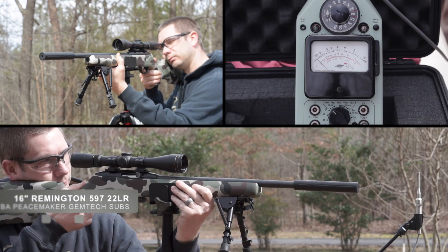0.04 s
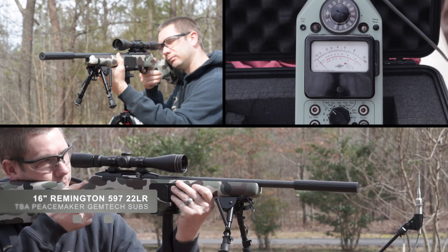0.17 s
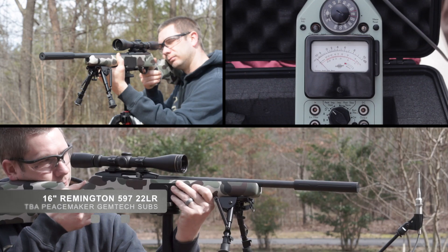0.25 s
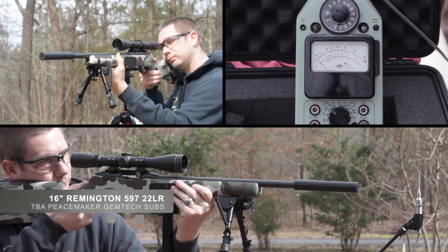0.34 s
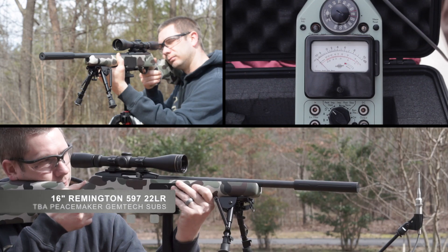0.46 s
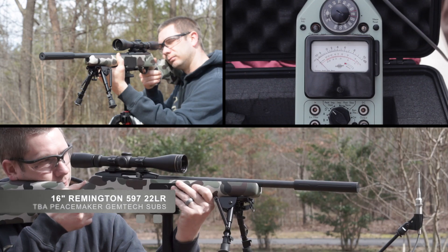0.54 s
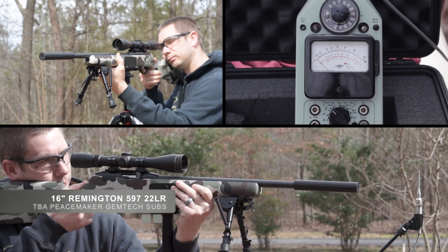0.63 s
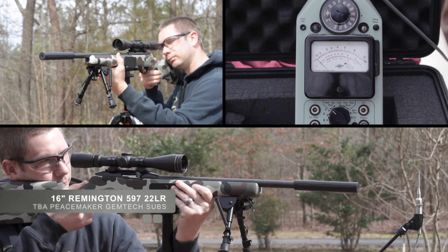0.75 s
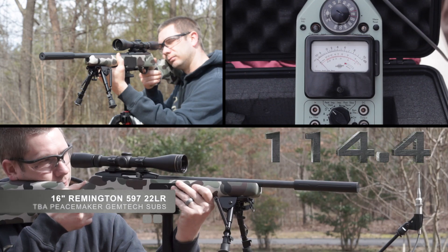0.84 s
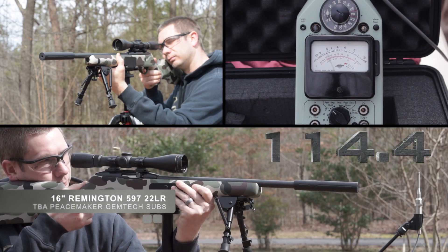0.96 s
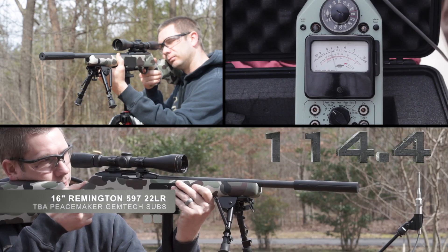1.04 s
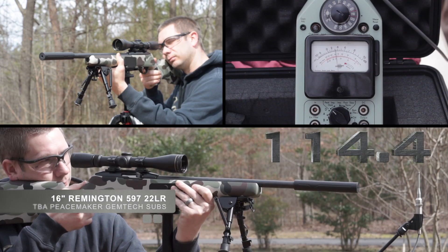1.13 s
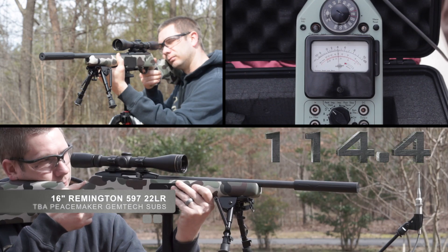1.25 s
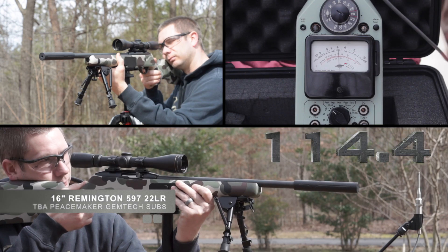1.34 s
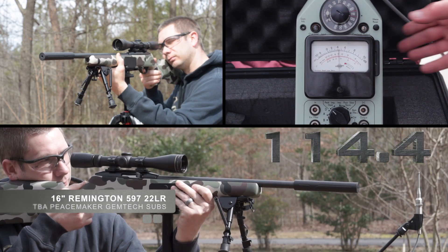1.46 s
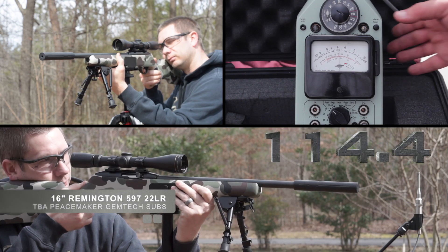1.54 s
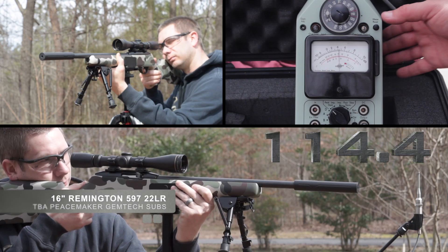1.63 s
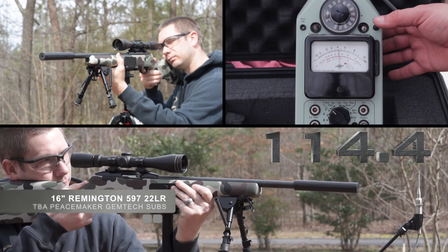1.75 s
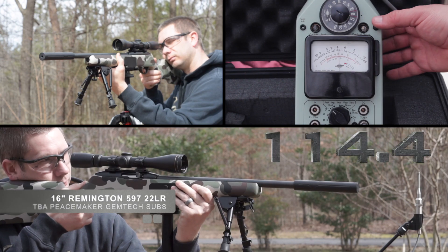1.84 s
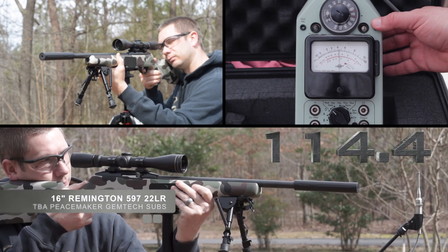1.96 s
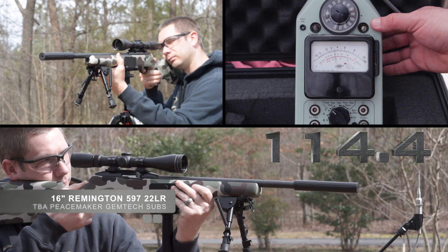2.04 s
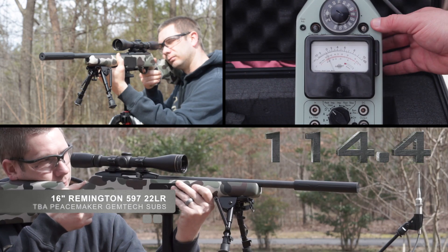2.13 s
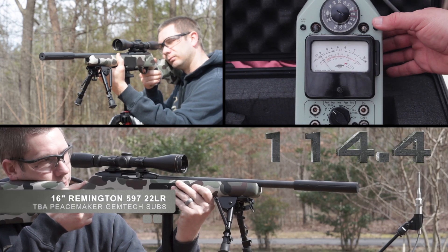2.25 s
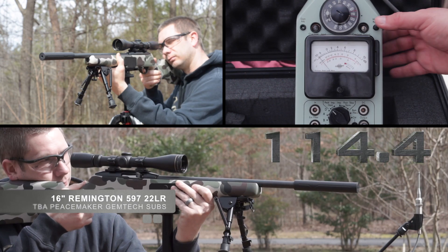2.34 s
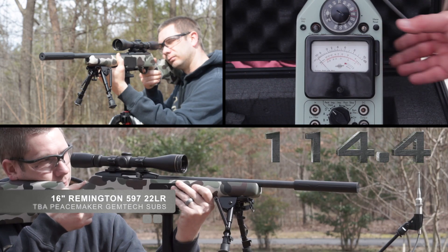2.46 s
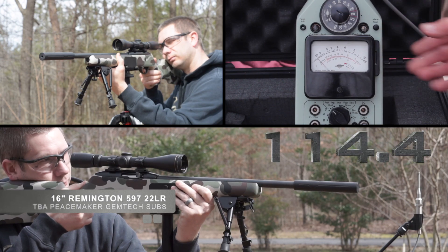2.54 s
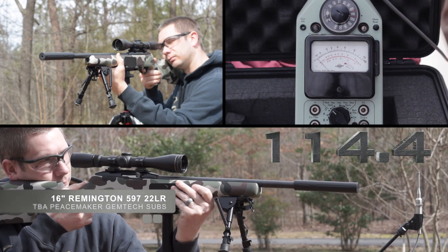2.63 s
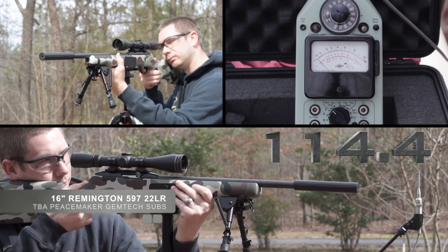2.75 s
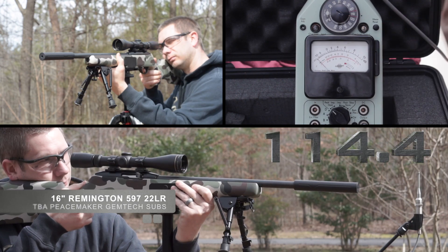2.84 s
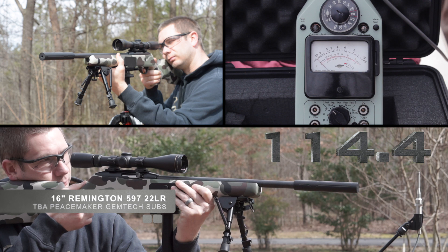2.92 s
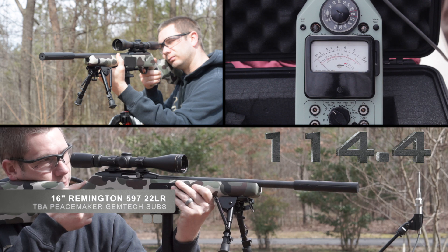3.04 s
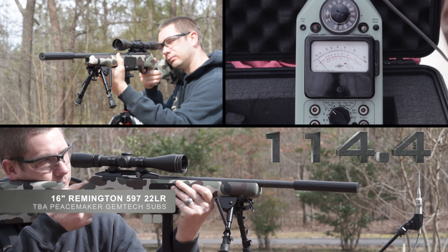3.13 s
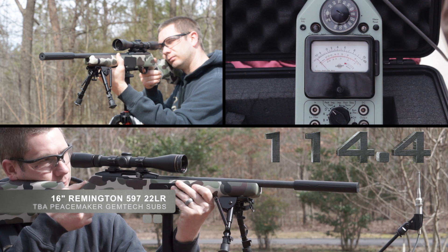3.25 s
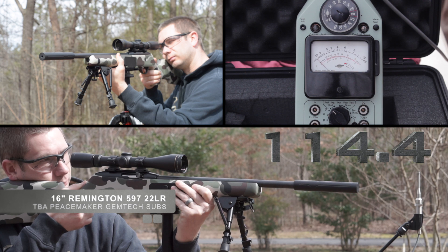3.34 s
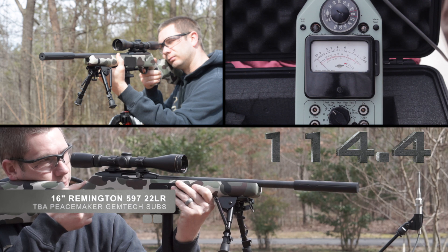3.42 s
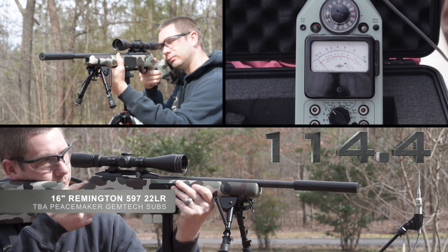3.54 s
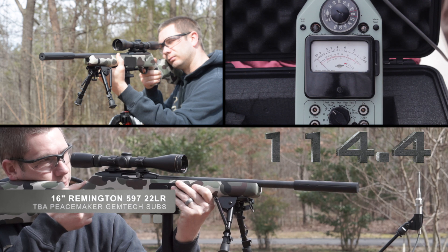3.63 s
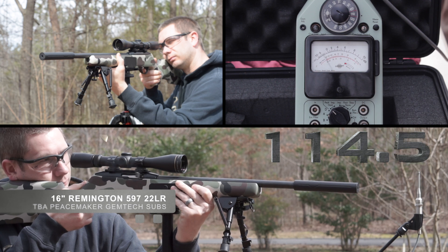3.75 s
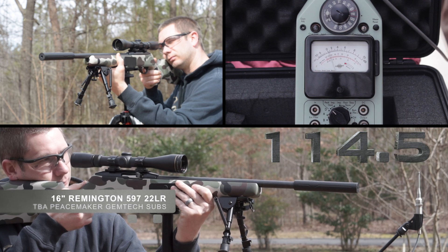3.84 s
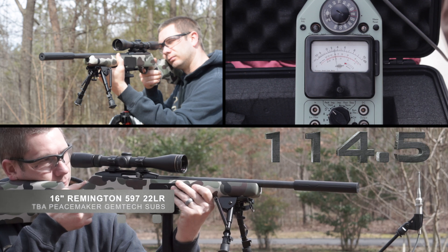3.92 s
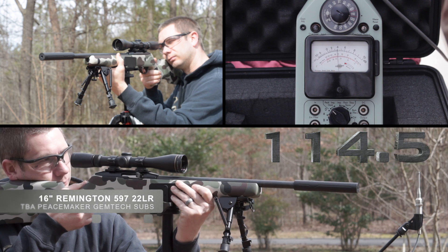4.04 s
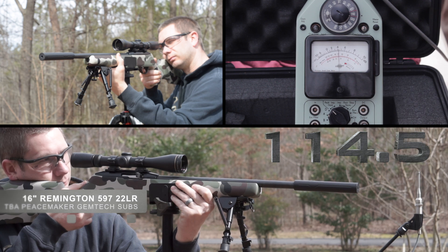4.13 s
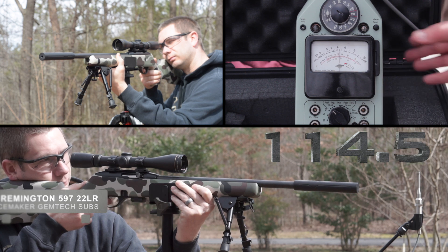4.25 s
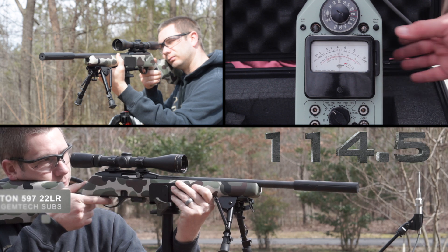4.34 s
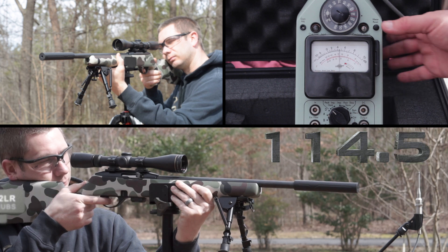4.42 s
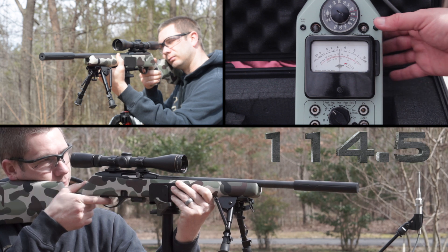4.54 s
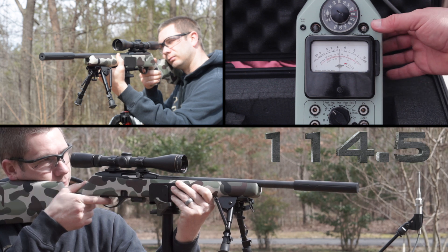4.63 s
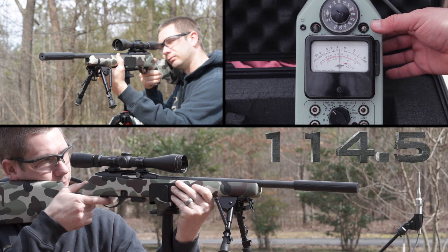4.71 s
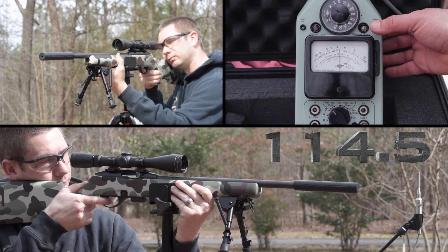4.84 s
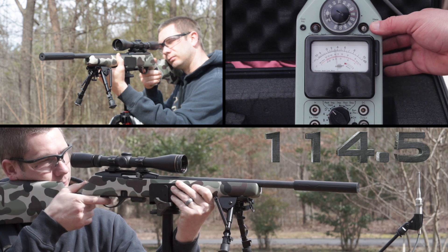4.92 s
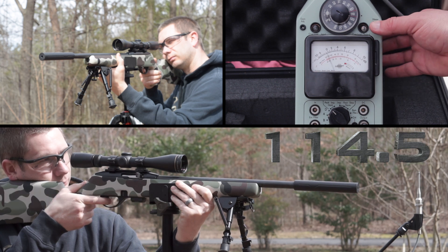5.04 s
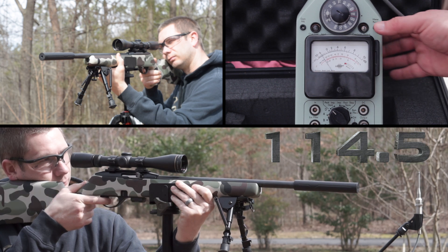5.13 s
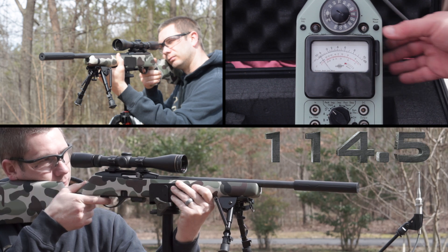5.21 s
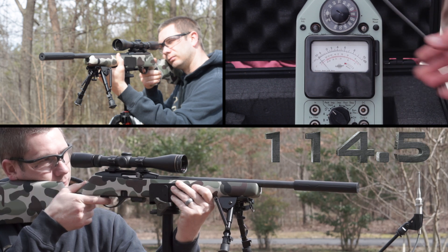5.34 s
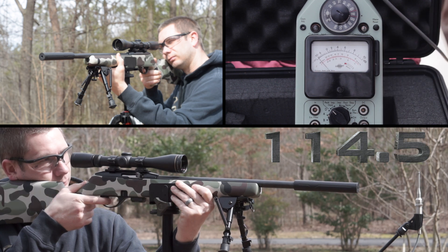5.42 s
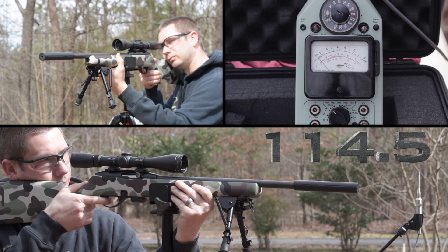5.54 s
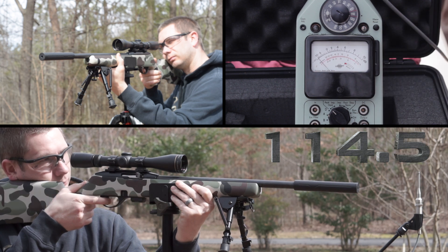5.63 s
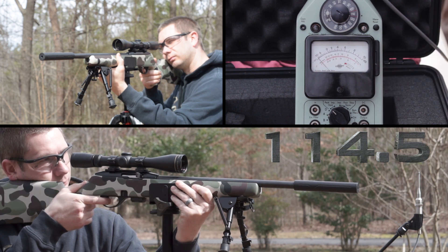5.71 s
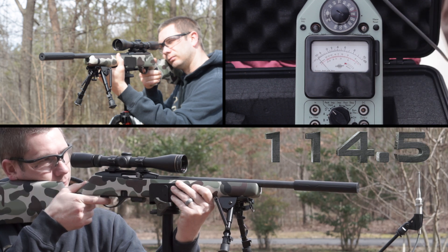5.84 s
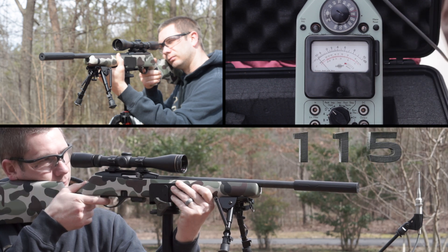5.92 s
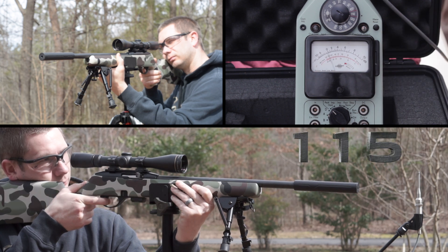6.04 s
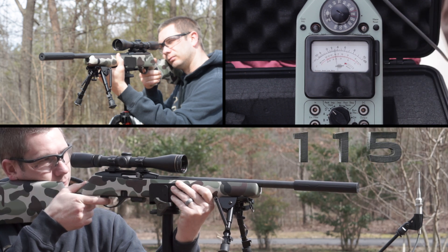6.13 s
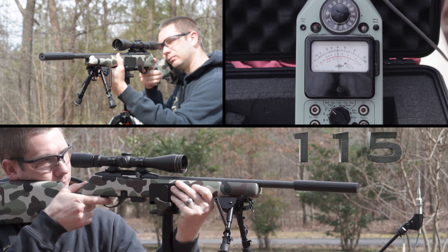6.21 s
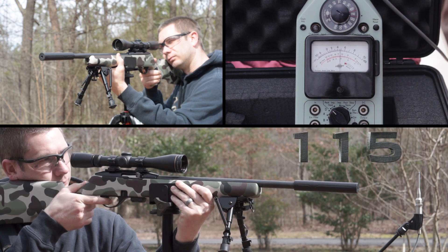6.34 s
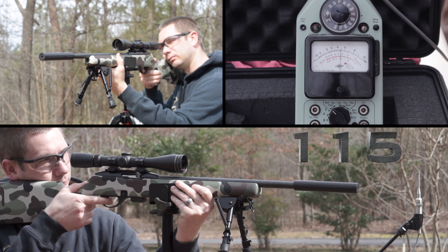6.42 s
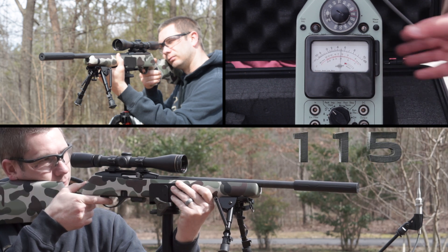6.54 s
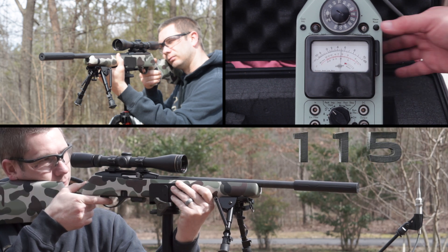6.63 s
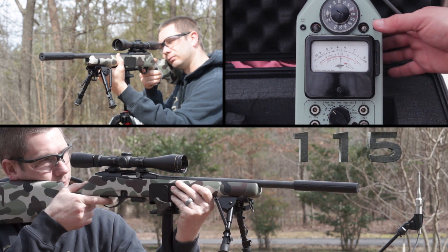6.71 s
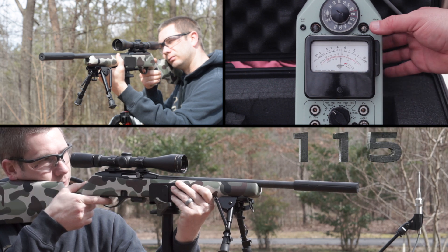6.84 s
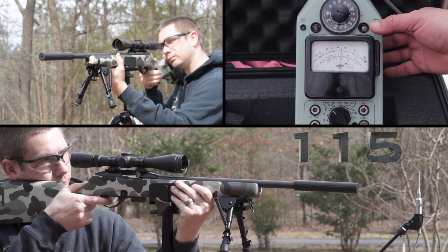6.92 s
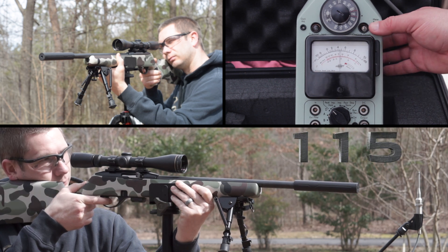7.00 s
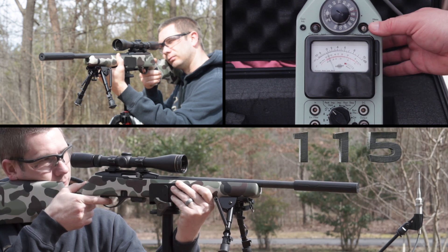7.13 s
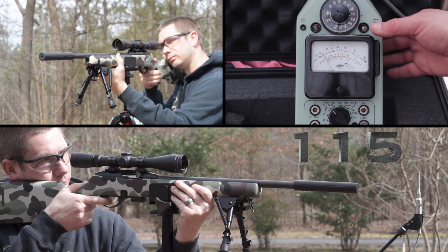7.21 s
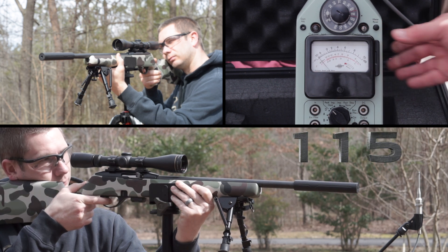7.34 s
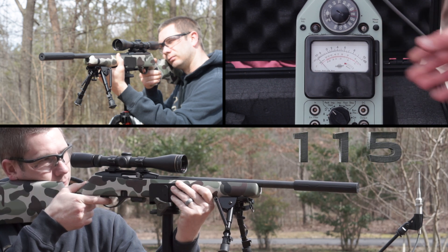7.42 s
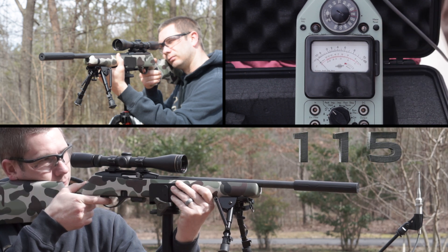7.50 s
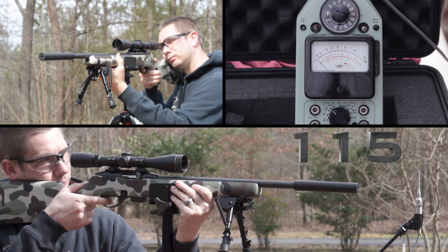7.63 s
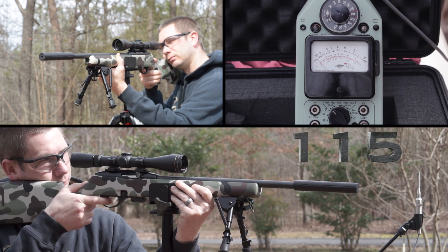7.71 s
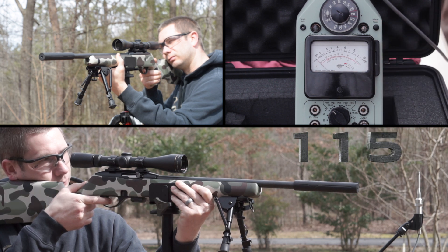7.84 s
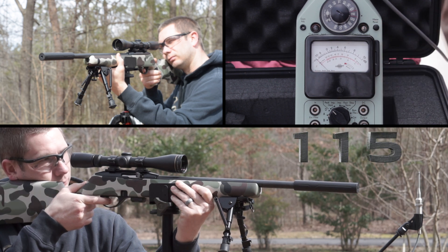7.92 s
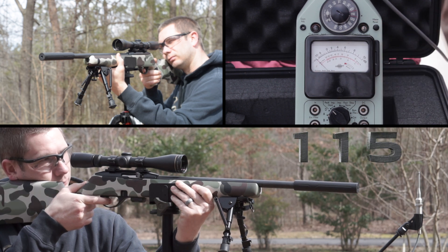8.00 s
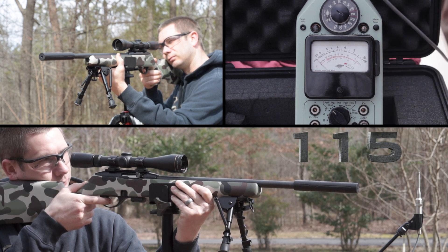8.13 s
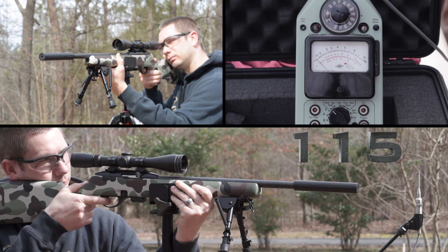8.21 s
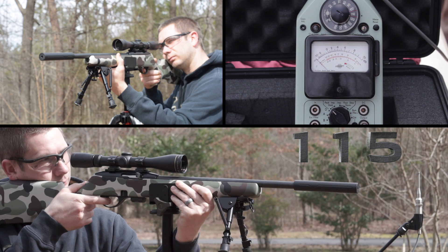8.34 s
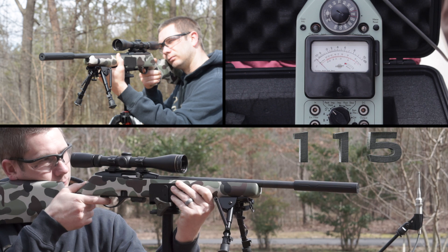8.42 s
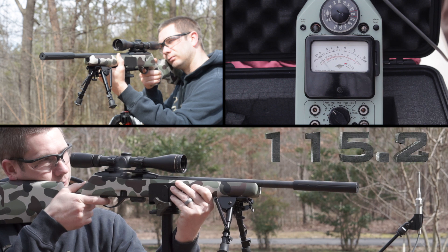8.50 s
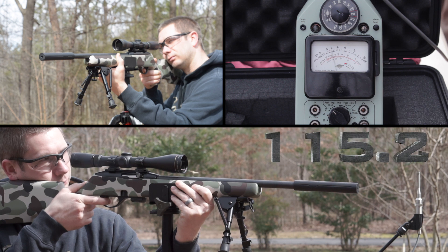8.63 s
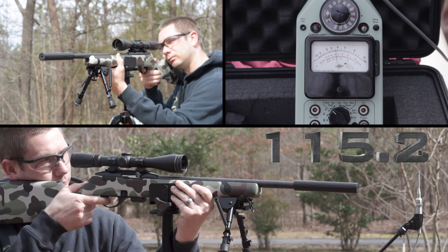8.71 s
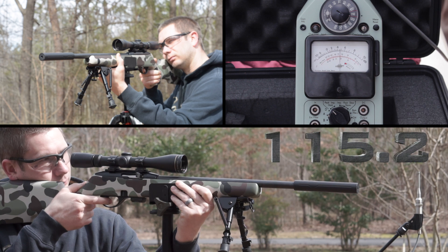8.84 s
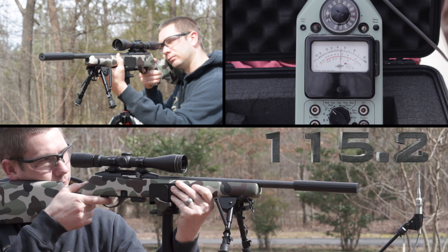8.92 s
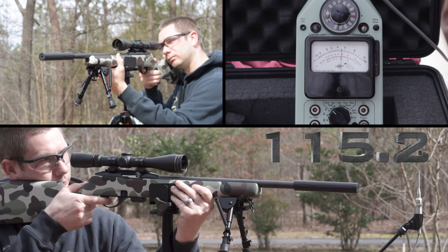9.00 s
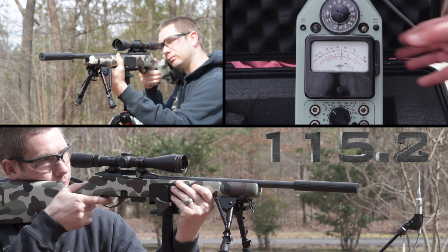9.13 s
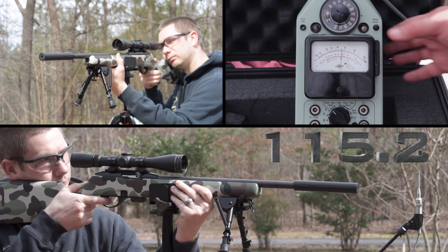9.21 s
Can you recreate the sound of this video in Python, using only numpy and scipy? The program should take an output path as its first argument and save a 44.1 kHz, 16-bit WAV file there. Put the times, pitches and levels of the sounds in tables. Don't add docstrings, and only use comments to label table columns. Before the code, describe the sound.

In a quiet wood, a silenced self-loading rifle snaps four times, its steel action clattering, with small case ticks and dull bumps between later shots.

```python
import sys
import numpy as np
from scipy import signal
from scipy.fft import rfft, irfft
from scipy.io import wavfile
from scipy.ndimage import uniform_filter1d

SR = 44100
rng = np.random.default_rng(int(sys.argv[2]) if len(sys.argv) > 2 else 0)


def unload_audio(sound):
    columns = np.transpose(np.atleast_2d(sound))
    steps = np.round(np.clip(columns, -1, 1) * 32767)
    wavfile.write(sys.argv[1], SR, steps.astype(np.int16))


def linear_from_db(decibels):
    return 10 ** (np.asarray(decibels, float) / 20)


N = 408581

# pitch_hz, level_db (per Hz)
HUM_AND_HISS = [(90, -30.5), (150, -3.5), (250, -7), (450, -10), (650, -10), (980, -8.5), (1540, -12.5),
                (2100, -19.5), (2800, -24.5), (6100, -28), (15100, -29.5), (16700, -33.5)]
# start_s, level_db
WIND_LEVEL = [(0.0, -73.5), (1.08, -66), (2.01, -69.5), (2.27, -66), (2.71, -68.5), (3.61, -69.5),
              (3.82, -66.5), (5.44, -68), (6.06, -66.5), (6.27, -70), (6.44, -66), (7.32, -67.5),
              (7.48, -64), (8.2, -58), (9.05, -69.5), (9.26, -68.5)]
# pitch_hz, level_db (per Hz)
WIND_COLOUR = [(20, -10.5), (40, -5.5), (80, 4), (120, -6), (200, -22.5), (400, -34)]
# muzzle_s, report_db, bolt_round_trip_s, echo_db
SHOTS = [
    (0.9211, -7.5, .0424, -5.5),
    (3.7645, -7, .0423, -4.5),
    (5.998, -7, .0414, -4),
    (8.5467, -6.5, .0441, -3.4),
]
# pitch_hz, level_db, t60_s (time to fade by 60 dB)
TRIGGER_RINGS = [(704, -8.5, 0.012), (1500, -8.5, 0.011), (2200, -9.5, 0.0055), (2816, 0, 0.01),
                 (3800, -2.5, 0.0091), (5200, -3, 0.0048), (6760, -5, 0.0028), (9000, -8.5, 0.0024)]
# pitch_hz, level_db, t60_s
SUPPRESSOR_RINGS = [(604.8, -7, 0.048), (985, -12.5, 0.028), (1510, -10, 0.053), (1910, -8.5, 0.035),
                    (2463, 8, 0.028), (2664, 0, 0.039), (3050, -7, 0.018), (3536, -2, .01),
                    (4570, 2, 0.0036), (5800, -9, 0.0066), (6660, -7.5, 0.0031), (9260, -10, 0.0027),
                    (13500, -15, .005)]
# share_of_round_trip, level_db (against the report)
BOLT_KNOCKS = [
    (.42, -24),
    (.59, -25.5),
    (.75, -26.5),
]
# pitch_hz, level_db, t60_s
BOLT_RINGS = [(663.7, -11.5, 0.046), (1329.5, -6, .04), (1558, -4, 0.061), (2150, -8, 0.015),
              (3800, -8.5, 0.015), (4570, 1.5, 0.01), (5530, 1, 0.0076), (7170, -9, 0.014),
              (8680, -4.5, .006), (10500, -8, 0.0054), (13240, -2.5, 0.011)]
# pitch_hz, level_db, t60_s
REBOUND_RINGS = [(840, -11.5, .02), (1530, 3.5, 0.04), (2500, -8.5, 0.025), (3700, -6.5, 0.06),
                 (4530, -2.5, 0.0077), (4970, -1.5, 0.0088), (7060, -12.5, 0.032), (8860, -11, 0.0041)]
# start_s, level_db
RESETS = [
    (1.2121, -45),
    (4.03, -45),
    (6.2775, -44),
    (8.834, -48),
]
# pitch_hz, near_trees_db, near_t60_s, far_trees_db, far_t60_s
TRUNK_ECHOES = [(250, -65, .2, -74.5, 1.1), (702.6, -62.5, 0.54, -75, 0.44), (1500, -58, 0.7, -66.5, 1.8),
                (2500, -49, 0.32, -59.5, 1.3), (4100, -51.5, 0.39, -65, 2.3), (5500, -54, 0.75, -66, 1.6),
                (7500, -53.5, .25, -66, .75), (10000, -52.5, 0.56, -66.5, 0.44),
                (15000, -54.5, .2, -69.5, .5)]
# delay_s, lift_db, spread_s
TREE_ROWS = [
    (.105, -4, 0.014),
    (.132, 3, 0.0022),
    (0.149, 7, 0.0011),
    (0.191, 5, 0.0032),
    (.21, -1.5, .012),
    (0.329, -0.5, 0.005),
]
# pitch_hz, level_db, t60_s
ECHO_RING = (2480, -34.5, 0.015)
# start_s, level_db, pitch_hz
CASE_TICKS = [
    (4.207, -73.5, 8500),
    (4.218, -64, 1185),
    (6.382, -70, 2500),
    (6.394, -53, 5340),
    (6.434, -70, 9000),
    (6.638, -63.5, 3560),
    (8.983, -67.5, 9000),
    (8.995, -58.5, 2500),
    (9.237, -61, 1190),
]
# start_s, level_db, pitch_hz, t60_s
STAND_KNOCKS = [
    (4.216, -55, 325, 0.025),
    (4.239, -52, 112, 0.056),
    (6.329, -57, 70, .06),
    (6.436, -56, 297, 0.04),
    (6.447, -45, 85.8, 0.36),
    (8.99, -61, 298, .05),
    (9.223, -50, 80, 0.073),
]


def rms_one(x):
    return x / np.sqrt(np.mean(x ** 2) + 1e-20)


def passed(x, order, hz, kind="low"):
    return signal.sosfilt(signal.butter(order, hz, kind, fs=SR, output="sos"), x)


def at_hz(points, hz, column=1):
    table = np.array(points)
    return np.interp(np.log(hz), np.log(table[:, 0]), table[:, column])


def add(track, start_s, sound):
    i = round(start_s * SR)
    track[i:i + len(sound)] += sound[:N - i]


def drift(rate_hz):
    r = np.exp(-80 * np.pi * rate_hz / SR)
    slow = signal.lfilter([1], [1, -2 * r, r * r], rng.standard_normal(N // 40 + 2002))[2000:]
    return np.interp(np.arange(N) / 40, np.arange(len(slow)), rms_one(slow))


def noise_bands(size, low_hz, high_hz):
    edges = low_hz * 2 ** np.arange(0, np.log2(high_hz / low_hz), 0.5)
    white = rng.standard_normal((2, size))
    for k, low in enumerate(edges):
        high = min(low * np.sqrt(2), 0.45 * SR)
        yield np.sqrt(low * high), passed(white[k % 2], 2, [low, high], "band")


def ring(push, hz, t60_s):
    r = linear_from_db(-60 / (t60_s * SR))
    w = 2 * np.pi * hz / SR
    return signal.lfilter([0, np.sin(w)], [1, -2 * r * np.cos(w), r * r], push)


def strike(rings, level_db, burst_s, rise_s, crack_db, crack_hz):
    t = np.arange(3500) / SR
    push = rng.laplace(size=len(t)) * (1 - np.exp(-t / rise_s)) * np.exp(-t / burst_s)
    body = 0
    for hz, db, t60_s in rings:
        body = body + rms_one(ring(push, hz, t60_s)) * linear_from_db(db + rng.normal(0, 1.2))
    crack = passed(push, 1, crack_hz)
    sound = rms_one(body) + linear_from_db(crack_db) * rms_one(crack)
    return linear_from_db(level_db) * 0.083 * rms_one(passed(sound, 4, 430, "high"))


def ambience():
    hz = np.maximum(np.fft.rfftfreq(N, 1 / SR), 1)
    noise = irfft(rfft(rng.standard_normal(N)) * linear_from_db(at_hz(HUM_AND_HISS, hz)), N)
    return linear_from_db(-73.5 + 0.5 * drift(0.94)) * rms_one(noise)


def wind():
    gust = drift(1.3)
    rumble = 0
    for hz, noise in noise_bands(size=N, low_hz=20, high_hz=400):
        flutter = drift(7.1)
        rumble = rumble + noise * linear_from_db(at_hz(WIND_COLOUR, hz) + 1.1 * gust + 0.38 * flutter)
    level_db = np.interp(np.arange(N) / SR, *np.transpose(WIND_LEVEL))
    return linear_from_db(level_db) * rms_one(rumble)


def hammer_fall(out, muzzle_s, db):
    add(out, muzzle_s - 0.0046, strike(TRIGGER_RINGS, db - 21.5, burst_s=0.004, rise_s=0.00035,
                                       crack_db=-0.5, crack_hz=9000))


def gas_burst(out, muzzle_s, db):
    add(out, muzzle_s - 0.0005, strike(SUPPRESSOR_RINGS, db, burst_s=0.0046, rise_s=0.0002,
                                       crack_db=-1.5, crack_hz=6940))
    shove = passed(np.pad(np.hanning(60), (0, 3000)), 2, 60, "high")
    add(out, muzzle_s + 0.0027, -linear_from_db(-21) / 30 * ring(shove, hz=155, t60_s=0.02))


def gas_dip_and_case_pop(out, muzzle_s, db):
    pulse = signal.lfilter([1, -1], [1, -0.97], np.pad(np.hanning(24), (0, 600)))
    add(out, muzzle_s + 0.0042 - 0.0003, -linear_from_db(-11) * pulse)
    add(out, muzzle_s + 0.0073, strike(TRIGGER_RINGS[2:], db - 10.5, burst_s=0.00034, rise_s=0.0001,
                                       crack_db=-2, crack_hz=9000))


def bolt_travel(out, muzzle_s, db, trip_s):
    for share, knock_db in BOLT_KNOCKS:
        add(out, muzzle_s + share * trip_s, strike(REBOUND_RINGS, db + knock_db, burst_s=0.0013,
                                                   rise_s=0.00026, crack_db=-2, crack_hz=8000))


def bolt_slam(out, slam_s, db):
    add(out, slam_s - 0.0002, strike(BOLT_RINGS, db - 5.5, burst_s=0.0006, rise_s=0.0001,
                                     crack_db=-4, crack_hz=12000))
    add(out, slam_s + 0.0206, strike(REBOUND_RINGS, db - 18.5, burst_s=0.00035, rise_s=0.00019,
                                     crack_db=-6, crack_hz=8010))


def trigger_reset(out, reset_s, db):
    add(out, reset_s, strike(TRIGGER_RINGS, db, burst_s=0.002, rise_s=0.00067, crack_db=-7.5, crack_hz=8105))
    add(out, reset_s + 0.0058, strike(TRIGGER_RINGS[:6], db - 7, burst_s=0.0011, rise_s=0.00026,
                                      crack_db=-23, crack_hz=4300))


def rifle():
    out = np.zeros(N)
    for (muzzle_s, db, trip_s, _), (reset_s, reset_db) in zip(SHOTS, RESETS):
        hammer_fall(out, muzzle_s, db)
        gas_burst(out, muzzle_s, db)
        gas_dip_and_case_pop(out, muzzle_s, db)
        bolt_travel(out, muzzle_s, db, trip_s)
        bolt_slam(out, muzzle_s + trip_s, db)
        trigger_reset(out, reset_s, reset_db)
    return out


def ground(x):
    delay_s, level_db = 0.0055, -5
    dull = passed(x, 1, 7000)
    middle = passed(dull, 1, [300, 1500], "band")
    reflection = dull - (1 - linear_from_db(-6)) * middle
    return x + linear_from_db(level_db) * np.roll(reflection, round(delay_s * SR))


def woods():
    t = np.arange(60000) / SR
    out = np.zeros(N)
    lift_db = sum(db * np.exp(-0.5 * ((t - delay_s) / spread_s) ** 2) for delay_s, db, spread_s in TREE_ROWS)
    lumps = rms_one(uniform_filter1d(rng.standard_normal(len(t)), 200))
    lift_db += 3.2 * lumps * np.exp(-t / 0.25)
    ring_hz, ring_db, ring_t60_s = ECHO_RING
    for muzzle_s, _, _, echo_db in SHOTS:
        echoes = 0
        for hz, noise in noise_bands(size=len(t), low_hz=167, high_hz=17000):
            near_db, near_t60_s, far_db, far_t60_s = (at_hz(TRUNK_ECHOES, hz, column=c) for c in (1, 2, 3, 4))
            near = linear_from_db(near_db - 60 * t / near_t60_s)
            far = linear_from_db(far_db - 60 * t / far_t60_s)
            echoes = echoes + rms_one(noise) * (near + far)
        echoes = echoes + linear_from_db(ring_db) * ring(echoes, ring_hz, ring_t60_s)
        fade_in = np.clip(t / 0.0033, 0, 1)
        add(out, muzzle_s, echoes * linear_from_db(lift_db + echo_db) * fade_in)
    return out


def case_ticks():
    out = np.zeros(N)
    for start_s, db, hz in CASE_TICKS:
        rings = [(hz, 2.5, 0.016), (0.59 * hz, -3, 0.002), (0.9 * hz, -3, 0.004)]  # pitch_hz, level_db, t60_s
        add(out, start_s, strike(rings, db, burst_s=0.00023, rise_s=0.0001, crack_db=-7.5, crack_hz=4000))
    return out


def stand_knocks():
    out = np.zeros(N)
    bump = np.pad(np.hanning(60), (0, 15000))
    for start_s, db, hz, t60_s in STAND_KNOCKS:
        add(out, start_s, linear_from_db(db) / 30 * ring(bump, hz, t60_s))
    return out


def scene():
    background = ambience() + wind()
    shots = ground(rifle()) + woods()
    return (background + shots + case_ticks() + stand_knocks())[None]


def top_cut(x):
    return signal.sosfilt(signal.butter(12, 16840, fs=SR, output="sos"), x)


def record(dry):
    mix = passed(dry, 12, 16000)
    return top_cut(mix)


dry = scene()
out = record(dry)
unload_audio(out)
```